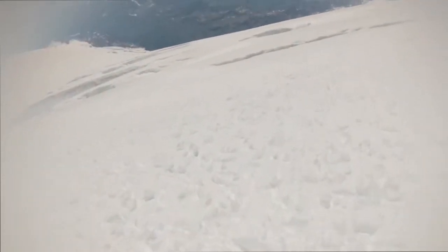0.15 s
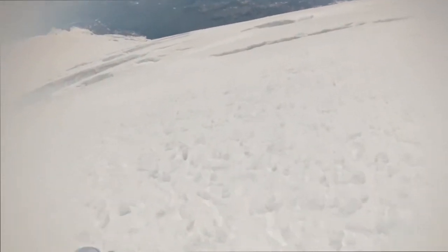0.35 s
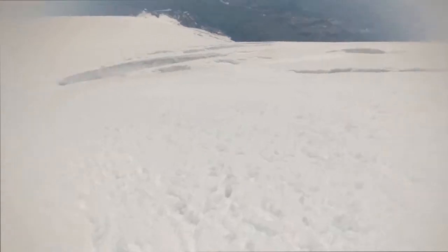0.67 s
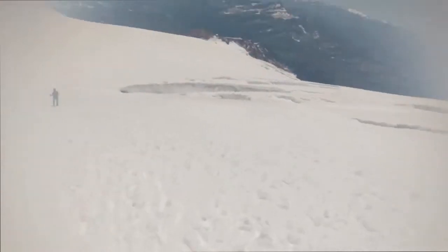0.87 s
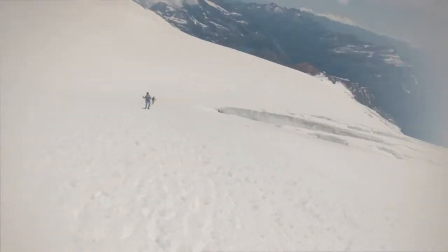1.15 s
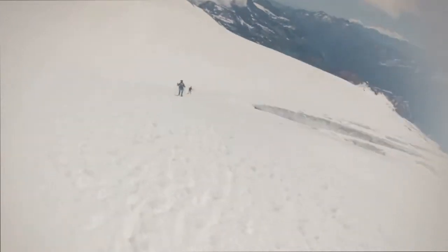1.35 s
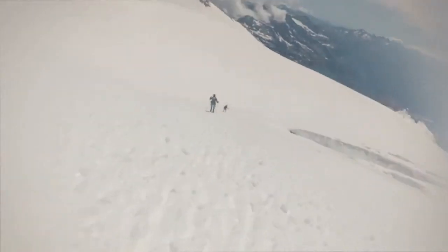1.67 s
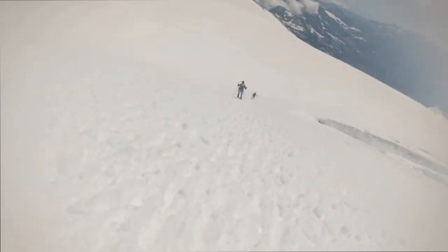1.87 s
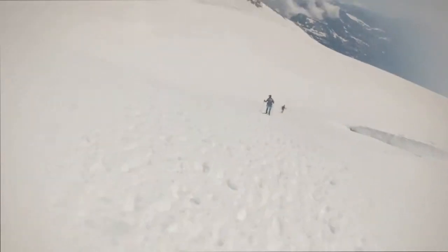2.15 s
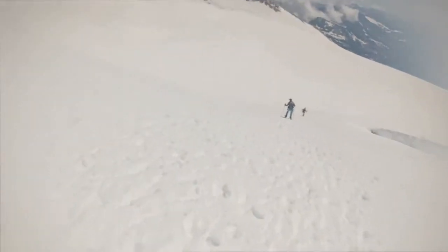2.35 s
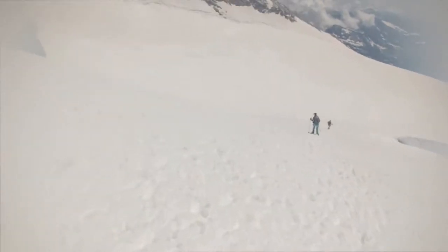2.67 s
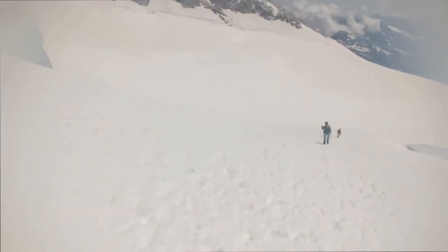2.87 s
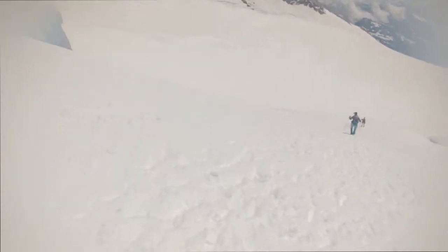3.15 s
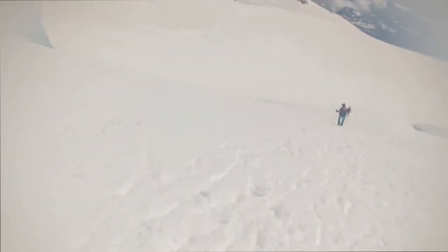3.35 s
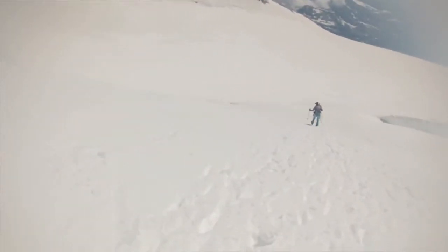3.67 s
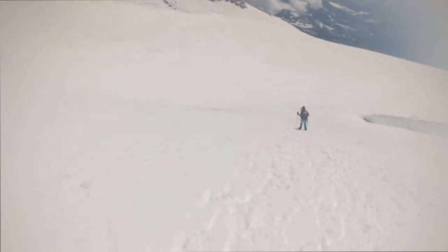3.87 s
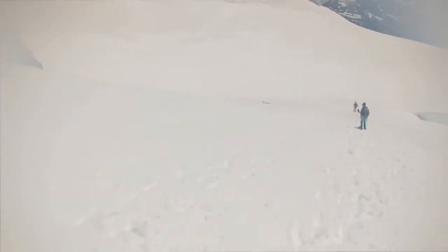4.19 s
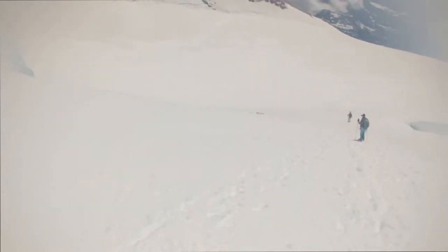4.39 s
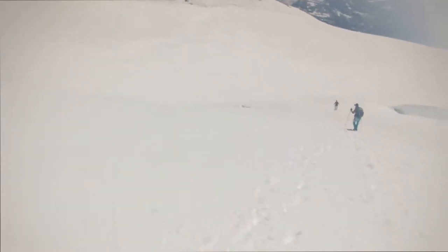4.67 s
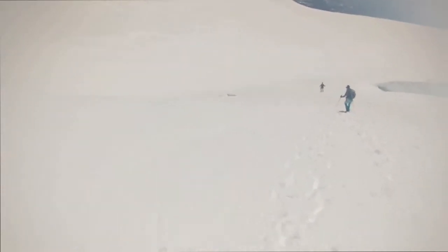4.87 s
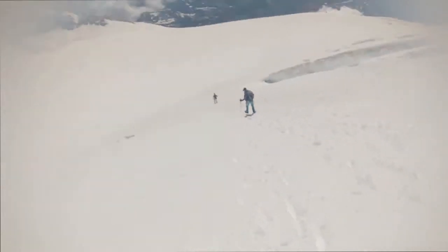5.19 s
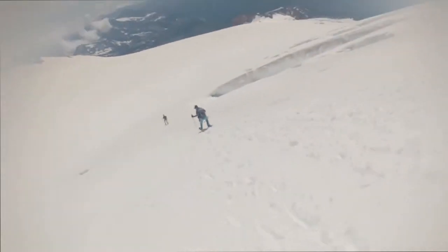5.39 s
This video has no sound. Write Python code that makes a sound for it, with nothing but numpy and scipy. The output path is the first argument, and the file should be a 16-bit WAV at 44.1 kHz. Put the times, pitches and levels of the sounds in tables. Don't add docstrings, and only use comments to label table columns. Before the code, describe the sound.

Open mountain snowfield, heard through a boxy, resonant camera housing worn by a skier. Uneven snow hiss and small hard knocks begin at once over soft wind rumble. A turn brings deep gusts, a rough flutter of air and sharp pressure thumps around one and a half seconds; afterwards the skis come forward, rattling over lumps with only light low gusts until the end.

```python
import sys
import numpy as np
from scipy import signal
from scipy.fft import rfft, irfft
from scipy.io import wavfile
from scipy.ndimage import uniform_filter1d

SR = 44100
rng = np.random.default_rng(int(sys.argv[2]) if len(sys.argv) > 2 else 0)


def volts(x):
    e = np.asarray(x, float) / 20
    return 10 ** e


def output_pcm(signal):
    pcm = np.clip(np.atleast_2d(signal).T, -1, 1) * 32767
    wavfile.write(sys.argv[1], SR, np.round(pcm).astype(np.int16))


N = 243873
OPPOSITE = np.array([[1], [-1]])

# (time [s], roar [dB], share that differs between ports [0-1])
ROAR = [(0.0, -47.5, 0.01), (.79, -48, 0.02), (.85, -52, 0.05), (1.2, -52, 0.06), (1.32, -52, 0.15),
        (1.36, -52, 0.27), (1.7, -48.5, 0.25), (1.75, -49, 0.12), (1.79, -48.5, 0), (1.82, -53.5, 0.3),
        (1.87, -55, 0.15), (1.93, -57, 0.5), (2.01, -57, 0.43), (2.05, -61, 0.04), (2.4, -57.5, 0.07),
        (3.7, -60, 0.05), (5.53, -60, 0.05)]


def evened(x):
    return x / np.sqrt(np.mean(x ** 2) + 1e-20)


def read(points, hz):
    f, value = np.transpose(points)
    return np.interp(np.log(hz + 1), np.log(f + 1), value)


def shaped(x, points):
    gain = volts(read(points, np.fft.rfftfreq(N, 1 / SR)))
    return irfft(rfft(x) * gain, N)


def coloured(x, points):
    return evened(shaped(x, points))


def curves(rows):
    s, *columns = np.transpose(rows)
    return [np.interp(np.arange(N) / SR, s, c) for c in columns]


def bells(rows, t=np.arange(N) / SR):
    return [(value, np.exp(-((t - s) / half) ** 2)) for s, value, half in rows]


def summed(rows):
    return sum(db * bell for db, bell in bells(rows))


def with_peaks(level_db, rows):
    swells = sum((volts(db) * bell) ** 2 for db, bell in bells(rows))
    return 10 * np.log10(volts(level_db) ** 2 + swells)


def smoothed(x, seconds):
    size = max(int(seconds * SR), 1)
    return uniform_filter1d(uniform_filter1d(x, size), size)


def flicker(seconds):
    return evened(smoothed(rng.standard_normal(N), seconds))


def steadied(x, seconds, share):
    power = abs(smoothed(x ** 2, seconds)) + 0.051
    return evened(x / power ** (share / 2))


def ring(x, modes):
    out = np.zeros(N)
    for k, (hz, width, db) in enumerate(modes):
        r = np.exp(-np.pi * width / SR)
        pole = r * np.exp(2j * np.pi * hz / SR)
        out += (-1) ** k * volts(db) * signal.lfilter([1 - r], [1, -pole], x).imag
    return evened(out)


def wind_db():
    # (time [s], rumble [dB])
    push = [(0.0, -34), (0.25, -35.5), (0.55, -41.5), (0.85, -38), (1.15, -20.5), (1.3, -23.5), (1.75, -22),
            (2.0, -23.5), (2.2, -32.5), (2.9, -29.5), (3.2, -39), (3.6, -35), (4.3, -37), (4.9, -36.5),
            (5.2, -31), (5.53, -30.5)]
    # (time [s], peak [dB], half length [s])
    gusts = [(0.123, -34, 0.0062), (0.32, -27.5, 0.035), (0.5, -27.5, 0.074), (0.602, -28.5, 0.027),
             (0.668, -22, 0.0075), (0.78, -25.5, 0.02), (0.876, -24, 0.031), (0.987, -25, 0.053),
             (1.068, -14.5, 0.017), (1.228, -23.5, 0.027), (1.504, -14, 0.13), (1.604, -14, 0.052),
             (1.746, -15, 0.081), (1.816, -26, 0.011), (1.976, -21, .035), (2.042, -13, 0.013),
             (2.16, -28, 0.065), (2.298, -28, 0.037), (2.468, -24.5, 0.02), (2.595, -29, 0.013),
             (2.906, -27.5, 0.048), (3.255, -30, 0.034), (3.381, -26, 0.053), (3.757, -48.5, 0.045),
             (4.076, -27, 0.01), (4.468, -30, 0.017), (5, -35.5, 0.099), (5.272, -31.5, 0.01),
             (5.362, -22, 0.024), (5.454, -28.5, 0.053)]
    # (time [s], change [dB], half length [s])
    lulls = [(.22, -10, .025), (.815, -8, .02), (.915, -4, .02), (1.005, -6, .012), (1.113, -13, .035),
             (1.447, -16, .03), (1.568, -17, .045), (1.66, -9, .015), (1.71, -11, .014), (1.778, -16, .03),
             (1.9, -7, .045), (2.035, -9, .012), (2.09, -7, .03), (2.55, -6, .04), (2.78, -8, .04),
             (3.2, -6, .03), (4.28, -6, .04), (4.57, -8, .03), (5.3, -8, .012), (5.42, -7, .03)]
    return with_peaks(curves(push)[0], gusts) + summed(lulls)


def rumble():
    # (frequency [Hz], density [dB per Hz])
    eddy_colour = [(2.4, -41.5), (4.0, -7), (25, -1), (39, -3.5), (50, -9.5), (61, -16), (72, -25),
                   (76, 7.5), (95, -67), (120, -79), (210, -120)]
    lumps = steadied(coloured(rng.standard_normal(N), eddy_colour), seconds=0.028, share=0.74)
    eddies = volts(wind_db()) * lumps
    both = coloured(eddies, [(60, 11), (72, -17.0), (90, -43), (130, -42.0)]) * np.std(eddies)
    sideways = np.clip(5 * (curves(ROAR)[1] - .08), 0, 1) * volts(wind_db() - 30)
    apart_colour = [(15, -9.0), (40, 0), (90, -4.0), (160, -8.5), (300, -35.5)]
    apart = sideways * coloured(rng.standard_normal(N), apart_colour)
    return both + apart * OPPOSITE


def roar():
    # (time [s], peak [dB], half length [s])
    bursts = [
        (1.393, -44, 0.021),
        (1.484, -41.5, 0.048),
        (1.655, -47.5, 0.018),
        (1.7, -51, 0.017),
        (1.825, -40, 0.022),
        (1.974, -48, 0.014),
        (2.127, -60, 0.052),
    ]
    # (frequency [Hz], density [dB per Hz])
    calm_colour = [(41, -36.5), (70, -2), (76, -2.5), (91, -14), (118, -19), (393, -26.5), (459, -27.5),
                   (1000, -31.5), (1300, -56), (2200, -120)]
    # (frequency [Hz], density [dB per Hz])
    gust_colour = [(35, -33), (60, -6), (81, -10), (233, -24.5), (1040, -38.5), (1350, -47), (1460, -33),
                   (2420, -40), (3000, -43), (3900, -46.5), (6600, -120)]
    steady_db, apart = curves(ROAR)
    level_db = with_peaks(steady_db, bursts)
    gust = np.clip(0.61 + (level_db - steady_db) / 5, 0, 1)
    gust = gust * np.clip((level_db + 60.0) / 10, 0, 1)
    ports = []
    for noise in rng.standard_normal((2, N)):
        lumps = volts((1.5 + 0.23 * gust) * flicker(0.014))
        calm_part = (1 - gust) * coloured(noise, calm_colour)
        gust_part = gust * 0.89 * coloured(noise, gust_colour)
        ports.append(evened(lumps * (calm_part + gust_part)))
    side = np.clip(apart, 0, 1) * coloured(ports[1], [(60, -17.0), (130, -7.0), (400, 16.0)])
    return volts(level_db + 3.5) * (ports[0] + side * OPPOSITE)


def whistle(x, width):
    # (time [s], pitch [Hz])
    pitch = [(0.0, 1374), (1.05, 1390), (1.34, 1360), (1.37, 1450), (1.46, 1360), (1.63, 1384),
             (1.77, 1380), (2.06, 1370), (2.25, 1360), (2.9, 1385), (4.56, 1360), (4.59, 1396),
             (4.85, 1360), (5.31, 1420), (5.34, 1500), (5.41, 1324), (5.53, 1350)]
    turn = np.exp(2j * np.pi * np.cumsum(curves(pitch)[0]) / SR)
    r = np.exp(-np.pi * width / SR)
    return evened((turn * signal.lfilter([1 - r], [1, -r], x / turn)).real)


def scrape():
    # (time [s], scrape [dB], edge bite against the scrape [dB])
    skis = [(0.0, -64, 4), (0.1, -63.5, 6), (0.35, -60.5, 8.5), (0.7, -61.5, 7), (0.82, -65.5, 1),
            (1.2, -65, 1.5), (1.5, -63.5, -13.5), (1.75, -66.5, -4.5), (2.05, -62.5, -9.5),
            (2.3, -57, -6.5), (2.95, -62.5, -7), (3.2, -61.5, -5), (3.55, -59.5, -6), (3.9, -61.5, -5),
            (4.25, -61, -6), (4.95, -62.5, -7.5), (5.2, -64, 0), (5.53, -60.5, -5.5)]
    # (time [s], change [dB], half length [s])
    presses = [(.33, 1.5, 0.027), (.62, 1, 0.015), (1.22, -19, 0.014), (1.26, 4.5, 0.014),
               (1.4, -10.5, 0.02), (1.545, 0, 0.012), (1.62, -1, 0.014), (1.66, 7, 0.0064),
               (1.71, 0.5, 0.0085), (1.75, -1.5, 0.051), (1.82, 11.5, 0.039), (1.89, -9.5, 0.048),
               (2.38, -6, 0.089), (2.55, -3.5, 0.047), (2.86, -0.5, 0.034), (2.96, 4, 0.056),
               (3.73, -6, 0.15), (3.81, 4, 0.036), (4.06, -4.5, 0.1), (4.17, -1, 0.017), (4.35, -2, 0.012),
               (4.41, 2, 0.0067), (4.74, -3, 0.019), (4.8, -5, 0.024), (4.9, -1.5, 0.083),
               (5.1, -0.5, 0.022), (5.27, -4.5, 0.028), (5.355, -14, 0.051), (5.45, -5.5, 0.017)]
    # (time [s], change [dB], half length [s])
    skids = [
        (1.05, 0.5, 0.12),
        (1.55, -0.5, 0.25),
        (3.65, 0.5, 0.095),
        (4.07, -1, 0.051),
        (4.58, -4.5, 0.036),
        (4.8, -3.5, 0.023),
        (5.1, -2, 0.035),
        (5.33, -4, 0.067),
    ]
    # (time [s], change [dB], half length [s])
    loads = [
        (.6, 4.5, 0.15),
        (2.3, 2, 0.13),
        (3.75, -1, .15),
        (4.95, -1, 0.45),
    ]
    # (frequency [Hz], width [Hz], level [dB])
    under_mode = [(1111, 100, 0)]
    low_modes = [(1360, 84, -1), (1573, 113, -5.5)]
    edge_modes = [(1878, 290, -3.5), (2090, 220, -5.5)]
    body_mode = [(2403, 220, 0)]
    high_modes = [(3210, 460, -3), (4025, 264, 1.5), (4736, 270, 0.5), (5197, 390, 1), (6370, 470, -5),
                  (6790, 210, 0), (7590, 480, -4.5), (8784, 670, -9), (11126, 590, -9.5), (9560, 540, -18),
                  (11530, 900, -29), (13920, 4800, -16.5)]
    # (frequency [Hz], level [dB])
    port_difference = [(300, -27), (1300, -26), (2400, -18.5), (4300, -11.5), (8000, -6), (14000, 0)]
    level_db, edge_db = curves(skis)
    press_db = summed(presses)
    level_db = level_db + press_db
    edge_db = edge_db + 1.14 * np.maximum(press_db, 0)
    ring_db = 6 + 0.15 * press_db + 1.6 * flicker(0.019) + summed(skids)
    spray_db = 3 - 0.11 * press_db
    under_db = -7 + summed(loads)
    bursts = volts(1.3 * flicker(0.017) + 1.4 * flicker(0.0047))
    spatter = volts(1.4 * flicker(0.016))
    sides = []
    for noise in rng.standard_normal((2, N)):
        grains = volts(5.4 * np.minimum(rng.exponential(1, N), 4)) * (rng.random(N) < 400 / SR)
        grains *= rng.choice([-1., 1.], N)
        body = bursts * (noise + 0.39 * evened(grains))
        spray = bursts ** .5 * spatter * (noise + 0.19 * evened(grains))
        main = ring(body, low_modes) + volts(-6.0) * whistle(body, width=40)
        main = main - volts(under_db) * ring(body, under_mode)
        edge = volts(edge_db - 4.0) * ring(body, edge_modes)
        high = volts(spray_db - 2.5) * ring(spray, high_modes)
        sides.append(volts(ring_db - 3.0) * main + edge - ring(body, body_mode) + high)
    side = shaped(sides[1], port_difference)
    return volts(level_db + 1.49) * (sides[0] + side * OPPOSITE)


def knocks():
    # (time [s], peak [dB], pitch [Hz])
    lumps = [(0.059, -39, 1400), (0.246, -36, 1440), (0.32, -30.5, 1435), (.4085, -36, 1440),
             (0.475, -45, 1550), (.6215, -38.5, 1440), (1.246, -44, 1330), (1.6837, -39, 1340),
             (2.1562, -36, 1400), (2.307, -47, 1520), (2.5805, -38, 1460), (2.997, -38, 1360),
             (3.445, -50, 1390), (3.79, -36.5, 1414), (3.865, -37, 1355), (4.011, -39.5, 1350),
             (4.174, -37.5, 1400), (4.2047, -44, 1410), (4.498, -38.5, 1355), (4.652, -41, 1380),
             (4.73, -37.5, 1360), (4.96, -41, 1390), (4.989, -40, 1370), (5.452, -42, 1360),
             (5.4995, -48, 1365), (1.4786, -39.5, 1320), (1.653, -40.5, 1474), (1.7945, -29.5, 1340),
             (2.1165, -38, 1340), (2.467, -45, 1300), (2.5548, -29.5, 1426), (2.621, -39, 1400),
             (2.675, -32.5, 1344), (2.926, -38, 1370), (2.945, -29, 1405), (3.022, -35, 1380),
             (3.117, -36.5, 1400), (3.305, -32, 1340), (3.3935, -34.5, 1420), (3.493, -39.5, 1434),
             (3.519, -34.5, 1360), (3.595, -36, 1400), (3.909, -36, 1346), (4.153, -33.5, 1403),
             (4.395, -32, 1377), (4.439, -36.5, 1394), (4.614, -35, 1454), (4.704, -36.5, 1370),
             (4.74, -29, 1397), (4.847, -42, 1260), (4.897, -37.5, 1365), (5.017, -36.5, 1480),
             (5.1586, -39, 1460)]
    # (time [s], peak [dB], pitch [Hz])
    ticks = [
        (0.4738, -48.5, 3910),
        (1.5022, -38.5, 3420),
        (1.5165, -33.5, 3530),
        (1.4, -40.5, 4300),
        (1.538, -38, 2200),
        (1.4, -43, 2520),
        (1.8, -47, 3280),
        (3.3932, -37, 6980),
        (3.8, -49, 7100),
        (3.254, -46, 467),
    ]
    out, t = np.zeros(N + 2000), np.arange(2000) / SR
    swell = (1 - np.exp(-t / .0014)) * volts(-60 * t / 0.032)
    bright = np.sin(2 * np.pi * 2420 * t) * volts(-60 * t / 0.026)
    chance = rng.random((len(lumps + ticks), 2))
    for (s, db, hz), (phase, tick) in zip(lumps + ticks, chance):
        tone = np.sin(2 * np.pi * (hz * t + phase)) + 0.45 * tick * bright
        at = round(s * SR)
        out[at:at + 2000] += volts(db - 2.5) * swell * tone
    return out[:N]


def pressure_dip(t):
    return (1 - (t / 0.014) ** 2) / (1 + (t / 0.0065) ** 2) ** 2


def slaps():
    # (time [s], peak [dB], puff [dB])
    hits = [
        (0.244, -52, -61),
        (1.367, -20, -40.5),
        (1.402, -23, -48.5),
        (1.493, -27, -59),
        (1.516, -17, -46),
        (1.668, -22.5, -69.5),
        (1.705, -22, -44),
        (1.811, -61, -38),
        (1.843, -21, -73),
        (2.621, -51, -84),
    ]
    out, t = np.zeros((2, N + 4000)), (np.arange(4000) - 1000) / SR
    for (s, db, puff_db), noise in zip(hits, rng.standard_normal((len(hits), 3, 4000))):
        hiss = signal.lfilter([.06], [1, -1.6, .64], noise[0] + .5 * noise[1:])
        puff = hiss * np.exp(-(t / 0.0039) ** 2)
        at = round(s * SR) - 1000
        out[:, at:at + 4000] += volts(puff_db + 6.0) * puff - volts(db + 10.0) * pressure_dip(t)
    return out[:, :N]


def heaves():
    # (time [s], peak [dB], direction [+1 heave, -1 sag])
    swings = [(1.262, -28.5, 1), (1.506, -33, 1), (1.625, -33, -1), (1.722, -30, 1), (1.747, -25, -1),
              (1.82, -19, 1), (1.984, -24.5, -1), (2.607, -32.5, 1), (2.624, -25, -1), (2.881, -27, 1),
              (2.896, -37, -1), (3.368, -40, -1), (3.382, -35.5, 1)]
    out, t = np.zeros(N + 4000), (np.arange(4000) - 1000) / SR
    dip = pressure_dip(np.floor(0.54 * t * SR) / SR)
    for s, db, way in swings:
        at = round(s * SR) - 1000
        out[at:at + 4000] += np.sign(way) * volts(db + 10.5) * dip
    return out[:N]


def flutter():
    # (time [s], level [dB], half length [s])
    spells = [
        (0.753, -38.5, 0.038),
        (0.93, -32.5, 0.1),
        (1.045, -49, 0.031),
        (2.15, -40.5, 0.037),
        (3.145, -41, 0.076),
        (4.023, -43.5, 0.075),
        (4.193, -50, 0.06),
        (4.47, -44.5, 0.096),
        (5.18, -44, 0.047),
        (5.336, -44, 0.055),
    ]
    level_db = with_peaks(np.full(N, -70.), spells)
    lumps = coloured(rng.standard_normal(N), [(40, -28), (56, 10.5), (76, -6.5), (100, -36), (200, -68.5)])
    return volts(level_db) * steadied(lumps, seconds=0.064, share=0.43)


def scene():
    return rumble() + roar() + slaps() + heaves() + scrape() + knocks() + flutter()


def low_pass(x):
    return signal.sosfilt(signal.butter(12, 15190, fs=SR, output="sos"), x)


def record(dry):
    return low_pass(dry)


dry = scene()
out = record(dry)
output_pcm(out)
```